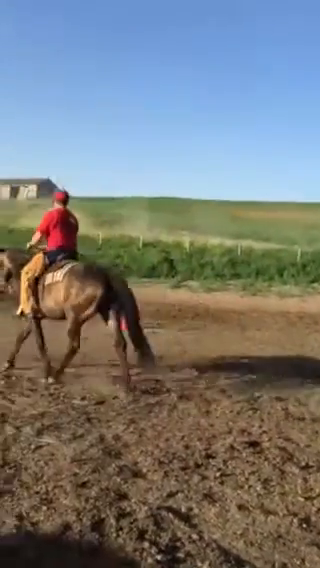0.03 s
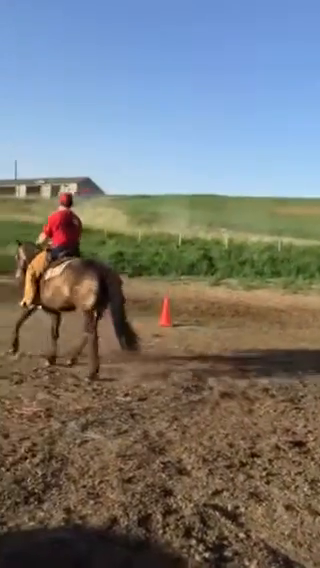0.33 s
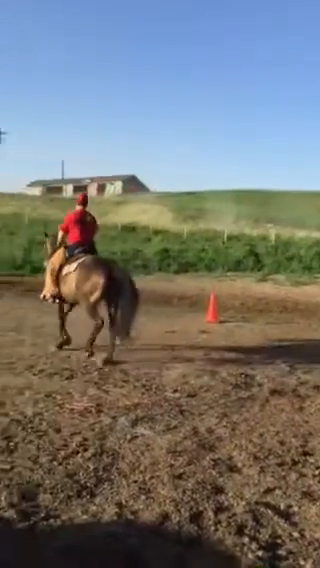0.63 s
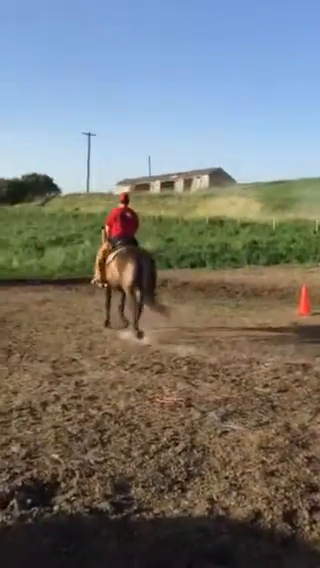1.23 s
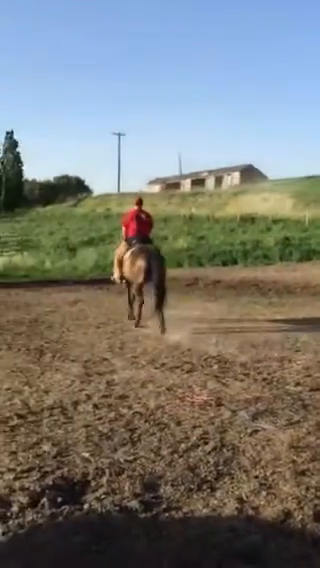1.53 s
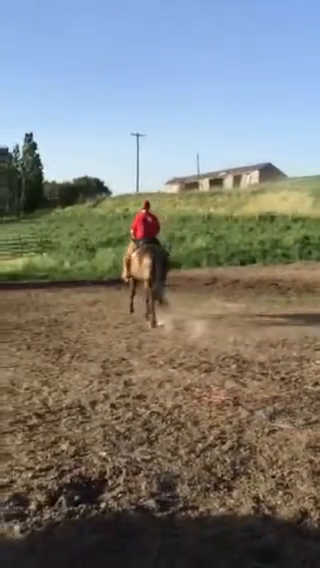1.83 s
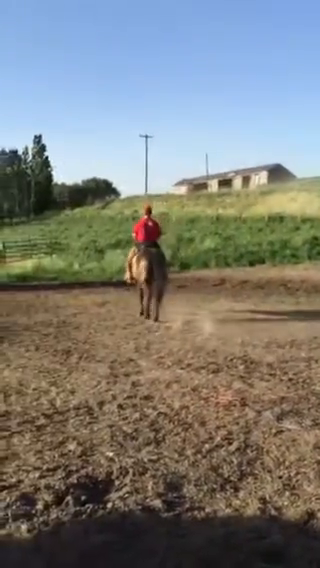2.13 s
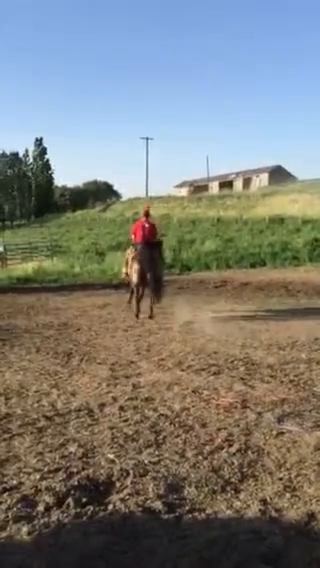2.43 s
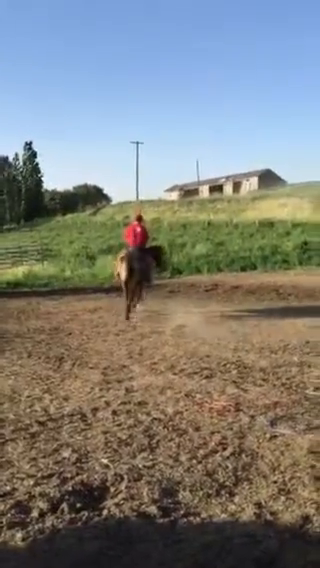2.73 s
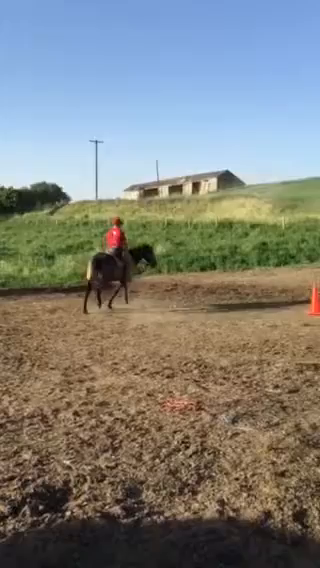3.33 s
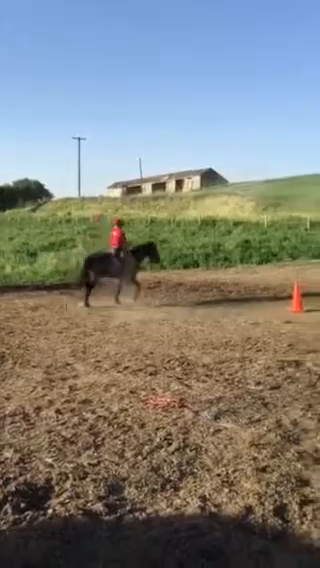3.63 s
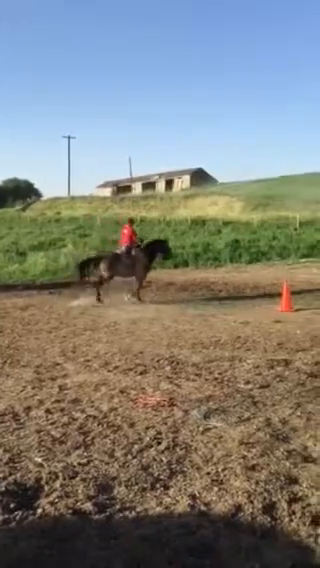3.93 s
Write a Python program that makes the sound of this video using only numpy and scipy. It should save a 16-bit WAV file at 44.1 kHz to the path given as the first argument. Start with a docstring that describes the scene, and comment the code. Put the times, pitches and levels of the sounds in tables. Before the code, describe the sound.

Metal tack clinks and jingles in irregular little bursts as a horse is ridden across an outdoor dirt arena. A gritty rush fades early, then wind gusts rumble and thump on the microphone over a faint, distant engine hum.

```python
"""A horse is ridden across a dirt arena, its metal tack clinking and rattling with its steps.
Knocked links give a crack and a short ring; two small pieces, probably spur rowels, ring until stopped.
Hooves scuff the dirt and kicked clods land. A broad, gritty rush dies away, a distant engine drones,
a small bird chips in threes, and gusts buffet the microphone with rumble, flutter and thumps."""
import sys
import numpy as np
from scipy import signal
from scipy.fft import rfft, irfft
from scipy.io import wavfile
from scipy.ndimage import uniform_filter1d

SR = 44100
rng = np.random.default_rng(int(sys.argv[2]) if len(sys.argv) > 2 else 0)


def transcribe(u):
    """Save the signal u as a 16-bit wav file named by the first command-line argument.

    u: samples, shape (n,) or (channels, n), limited to [-1, 1]; the rate is SR.
    q: integer samples, one column per channel.
    """
    v = np.clip(np.atleast_2d(u).T, -1, 1)
    q = np.round(v * 32767).astype(np.int16)
    wavfile.write(sys.argv[1], SR, q)


N = 176400
T = np.arange(N) / SR

# modes of a tack link, also heard in the chain: f/Hz, level/dB, t60/s
LINK_MODES = [(6980,-19,0.032),(7020,-7,0.055),(7740,-28,0.055),(8950,-12.5,0.039),(9730,-18,0.014),(10500,-32,0.013),(10980,-14.5,0.023),(11160,-4.5,0.028),(12100,-13,0.02),(14200,-18,0.016)]


def from_db(db):
    """Decibels to gain."""
    return np.exp(np.asarray(db) * (np.log(10) / 20))


def rms_one(x):
    """Scale to unit power."""
    return x / np.sqrt(np.mean(x ** 2) + 1e-20)


def automation(rows):
    """One curve per column, drawn through breakpoints that start with their time."""
    times, *columns = np.transpose(rows)
    return [np.interp(T, times, column) for column in columns]


def noise(spectrum, source=None):
    """White noise, or a given source, through an EQ curve (f/Hz, level/dB), at unit power."""
    hz, db = np.transpose(spectrum)
    bins = np.maximum(np.arange(N // 2 + 1) * SR / N, 1)
    source = rng.standard_normal(N) if source is None else source
    eq = from_db(np.interp(np.log(bins), np.log(hz), db, right=-120))
    return rms_one(irfft(rfft(source) * eq, N))


def drift(rate_hz):
    """A random modulator of unit power that rolls off above its rate."""
    bins = np.arange(N // 2 + 1) * SR / N
    return rms_one(irfft(rfft(rng.standard_normal(N)) / (1 + (bins / rate_hz) ** 2), N))


def evened(x, samples):
    """Ride out the slow swings of level."""
    return x / np.sqrt(uniform_filter1d(x * x, samples) + 1e-9)


def add(out, start, sound):
    """Mix a sound in at a start time in seconds."""
    i = int(np.clip(start * SR, 0, N))
    out[i:i + len(sound)] += sound[:N - i]


def gate(start, hold, attack_s, release_s):
    """An envelope that swells, holds and dies away exponentially."""
    return np.exp(np.minimum(T - start, 0) / attack_s - np.maximum(T - start - hold, 0) / release_s)


def grit(count=8000, low_hz=150, high_hz=6500, t60_s=.05, range_db=18):
    """Countless crumbs of dirt, each a tiny damped ping of its own pitch and size."""
    out, t = np.zeros(N), T[:SR // 25]
    for when, pitch, size, phase in rng.random((count, 4)):
        hz = low_hz + pitch * (high_hz - low_hz)
        envelope = from_db(range_db * size - 60 * t / t60_s)
        add(out, when * T[-1], envelope * np.sin(2 * np.pi * (hz * t + phase)))
    return rms_one(out)


def rush(grit_db=-5, air_db=-74, flicker_db=.5, grain_db=.5):
    """A broad, gritty rush in three bands dies away into still air."""
    # band faders: t/s, low level/dB, middle level/dB, treble level/dB
    faders = [(0.0, -41.5, -43.5, -50.5), (0.17, -42.5, -43.5, -54.5), (0.32, -45, -46.5, -54.5),
              (0.61, -48, -47.5, -61), (1.009, -52, -52.5, -67), (1.26, -56, -54, -66.5),
              (1.57, -69.5, -53.5, -61.5), (1.9, -63.5, -59.5, -68.5), (2.02, -64, -62.5, -70.5),
              (2.57, -69.5, -65.5, -79), (3.539, -71, -69, -84), (4.0, -71.5, -71.5, -85)]
    # colours of the three bands and of the air: f/Hz, level/dB
    low = [(120,-11),(180,3.5),(250,-8.5),(350,-21),(480,-3),(655,2),(760,-3.5),(875,3),(1200,-4.5),(1700,-11.5),(3000,-46)]
    middle = [(700,-0.5),(1100,-3),(1400,2.5),(1800,-1),(2150,-4),(2450,-2.5),(2700,-6),(3100,-14.5),(4500,-47)]
    treble = [(1800,-4.5),(2400,-4),(2700,5.5),(3200,-2),(3850,1.5),(4500,-4.5),(5300,-11),(6500,-13.5),(9000,-20),(15000,-22.5)]
    air = [(300,-11),(2000,5),(5000,4),(8000,-2),(12000,-5),(15500,-5.5)]
    trims_db = (0, -.5, 2.5)
    crumbs = from_db(grit_db) * grit()
    out = from_db(air_db) * noise(air)
    for fader_db, colour, trim_db in zip(automation(faders), (low, middle, treble), trims_db):
        source = rng.standard_normal(N) + np.roll(crumbs, rng.integers(N))
        level_db = fader_db + trim_db + flicker_db * drift(9.6) + grain_db * drift(290)
        out += from_db(level_db) * noise(colour, source)
    return out


def engine(wander=.006, waver_db=1.2, drone_db=-37, fade_db_per_s=2):
    """A far engine hums on four low harmonics of its speed, over a dull, fading drone."""
    # engine speed and hum fader: t/s, fundamental f/Hz, level/dB
    running = [(0,58.5,-36.5),(.4,58.2,-40.5),(1.0,57.8,-45),(1.5,57.8,-40),(1.9,57.5,-45.5),(2.2,53.5,-46.5),(2.8,53.5,-59),(3.3,54.5,-49),(3.65,54.3,-43),(4,53.5,-35.5)]
    # harmonics: multiple, level/dB
    orders = [(1,-19),(2,-2),(3,-9),(4,-23.5)]
    # drone colour: f/Hz, level/dB
    drone = [(15,-26),(30,-19),(48,-6.5),(70,4),(95,-5),(140,-3.5),(200,-14.5),(280,-28.5),(500,-44.5)]
    hz, db = automation(running)
    phase = 2 * np.pi * np.cumsum(hz * (1 + wander * drift(1.82))) / SR
    hum = np.zeros(N)
    for order, order_db in orders:
        gain = np.sqrt(2) * from_db(db + order_db + waver_db * drift(1.5))
        hum += gain * np.sin(order * phase + 2 * np.pi * rng.random())
    return hum + from_db(drone_db - fade_db_per_s * T) * evened(noise(drone), samples=2000)


def strike(hz, db, t60, t, spin, waver_db=2.6):
    """One blow on a metal piece; every mode wavers in level as the piece turns."""
    hz, db, t60 = np.array([hz, db, t60])[:, :, None]
    waver = spin[rng.integers(0, N - len(t), hz.shape) + np.arange(len(t))]
    envelopes = from_db(db + waver_db * waver - 60 * t / t60)
    return np.sum(envelopes * np.sin(2 * np.pi * (hz * t + rng.random(hz.shape))), axis=0)


def clinks(knocks, modes, spin, detune, trim_db=-13.5, crack_db=-8, crack_t60_s=.021):
    """Each knock on a link is a brief crack and a damped ring, its pitch and colour set by the contact."""
    pivot_hz, spread_db = 9100, 2.5
    out, t = np.zeros(N), T[:SR // 20]
    hz, mode_db, t60 = np.transpose(modes)
    tilt = .74 * np.tanh(4 * np.log2(hz / pivot_hz))  # bright knocks favour modes above the pivot
    crack_noise = noise([(2500, -23), (4000, 2.5), (5500, -4.5), (6800, -5),
                         (10000, 5.5), (12500, -2), (15500, -7.5)])
    crack_envelope = from_db(crack_db - 60 * t / crack_t60_s)
    for start, db, brightness in knocks:
        colour_db = mode_db + brightness * tilt + spread_db * rng.standard_normal(len(hz))
        detuned_hz = hz * (1 + detune * rng.standard_normal(len(hz)))
        ring = strike(detuned_hz, colour_db, t60, t, spin)
        crack = crack_noise[rng.integers(N - len(t)):][:len(t)] * crack_envelope
        add(out, start, from_db(db + trim_db) * (ring + crack))
    return out


def chain(spin, gap_s=.005, uneven_db=1.5):
    """A short chain shakes: a quick run of light touches, each on a link of another size."""
    # rattles: t/s, length/s, touch level/dB
    rattles = [(0.1,0.044,-46),(0.336,.045,-50),(0.429,.03,-42),(1.269,0.023,-46),(1.543,0.033,-51),(1.86,.04,-53),(2.219,0.023,-48),(2.261,.025,-50),(2.636,.04,-54),(2.687,0.05,-47),(3.108,.025,-49),(3.839,.015,-43)]
    touches = [(start + delay + gap_s * rng.random(), db + uneven_db * rng.standard_normal(), 0)
               for start, length, db in rattles for delay in np.arange(0, length, gap_s)]
    return clinks(touches, LINK_MODES, spin, detune=.12)


def tack(spin, detune=.009):
    """Two metal links knock with the horse's steps, the higher one taking over."""
    # knocks on each link: t/s, level/dB, brightness
    knocks = [(.1196,-28,-7),(0.1339,-29,13),(.302,-48,-22),(0.348,-47,14),(.364,-44,15),(.4324,-41,-16),(0.438,-42,1),(0.4496,-27,-7),(.456,-37,9),(.5437,-46,-17),(.565,-40,-4),(.6444,-44,-5),(.7507,-39.5,-8),(.8764,-46,29),(1.1004,-47.5,-4),(1.1852,-45,8),(1.198,-39,7),(1.277,-39,-2),(1.286,-33,-8),(1.291,-30.5,0),(1.35,-42,-13),(1.4905,-54.5,-24),(1.5468,-34.5,-8.5),(1.554,-36,0),(1.565,-40,4),(1.8582,-51,-2),(1.8861,-57,0),(1.992,-44.5,1),(2.1161,-55,-17),(2.2236,-41,11),(2.267,-36,11),(2.3201,-42.5,-9),(2.6479,-49,5),(2.6647,-45,4),(2.6813,-35.5,-16.5),(2.694,-51,9),(2.705,-40,0),(2.713,-32.5,-1)]
    high_knocks = [(2.472,-59.5,-21),(2.858,-50,1),(2.8968,-55,6),(3.0844,-52,0),(3.1158,-36,0.5),(3.125,-41,-2),(3.14,-50,8),(3.447,-45,-19),(3.463,-39,-6),(3.479,-47,19),(3.5294,-52,18),(3.7843,-50,7),(3.8385,-24.5,6.5),(3.84,-38,2),(3.853,-47,-2),(3.863,-49,-4),(3.908,-46,-5),]
    # modes of the higher link: f/Hz, level/dB, t60/s
    high_modes = [(7180,-19,0.034),(7730,-4,0.053),(7960,-10,0.057),(8840,-5.5,0.058),(9500,-2.5,0.02),(10200,-19,.015),(11050,-4,0.04),(11400,-14.5,0.049),(12300,-16,0.026),(14600,-26.5,0.017)]
    return clinks(knocks, LINK_MODES, spin, detune) + clinks(high_knocks, high_modes, spin, detune)


def rowel(hits, modes, bands_hz, spin, trim_db, rise_s=.005, stop_t60_s=.11):
    """A loose disc rings until it touches its holder; where it is hit decides which modes speak."""
    out, t = np.zeros(N), T[:SR // 3]
    hz, mode_db, t60, side = np.transpose(modes)
    attack = 1 - np.exp(-t / rise_s)
    for start, free_s, *band_db, lean_db in hits:
        twin_db = -10 * np.abs(side) * np.log10(1 + from_db(-side * lean_db) ** 2)  # twins share power
        ring = strike(hz, mode_db + twin_db + np.interp(hz, bands_hz, band_db), t60, t, spin)
        choke_db = -60 * np.maximum(t - free_s, 0) / stop_t60_s
        add(out, start, ring * attack * from_db(trim_db + choke_db))
    return out


def spurs(spin):
    """Two jolted rowels ring, shimmering as their close twin modes beat."""
    # hits on each rowel: t/s, free ring/s, level/dB for each band, lean between twins/dB
    first_hits = [(.134,.08,-70,-57.5,-60,-69,-60,-5),(.302,0.082,-63,-61,-61,-64,-61,-13),(.436,.09,-66,-70,-70,-72,-58,-5),(.5437,.15,-64,-60,-68,-71,-65,-17),(.7507,.09,-68,-67,-72,-69,-64,15),(1.1852,0.056,-65.5,-64,-70,-62,-65,4),(1.286,0.19,-68,-53.5,-64,-70,-63,13),(1.517,0.051,-65,-68,-69,-68,-61,5),(1.556,0.13,-65.5,-73,-66,-72,-61,-2),(1.8861,0.09,-71,-72,-73,-75,-80,0),(1.9924,0.11,-71,-78,-66.5,-87,-85,12),(2.2228,.04,-73,-57.5,-68,-76,-68,12),(2.3201,.14,-69,-69,-69,-69,-68.5,6),(2.582,.05,-73.5,-77,-76,-90,-83,12),(2.6813,0.11,-69.5,-77,-60,-68,-71,-3)]
    second_hits = [(.842,0.065,-78,-66,-84,-80,3),(1.8582,.05,-73,-70,-82,-86,5),(2.2667,0.019,-66.5,-65,-66,-79,5),(2.385,.2,-67,-66,-67.5,-82,8),(2.6653,.1,-80,-68.5,-61,-68,0),(2.762,0.034,-82,-61,-69,-75,0),(2.7931,0.067,-74,-55.5,-57,-70,-9),(3.1173,0.19,-77,-55,-60,-66,5),(3.4461,.13,-83,-63,-68,-67,-7),(3.8167,0.022,-73,-58,-73,-76,2),(3.8387,0.084,-70.5,-63,-61,-63,3),(3.912,.1,-72.5,-62.5,-72,-70,3)]
    # their modes: f/Hz, level/dB, t60/s, side of a twin pair (+-1, or 0 if single)
    first_modes = [(4225,0,.4,0),(7970,0,.36,-1),(8076,0,.45,1),(11030,0,.36,1),(11270,0,.26,-1),(13210,-7,.4,0),(13680,-1,.33,0),(15007,0,.55,0)]
    second_modes = [(4700,0,.7,0),(8742,0,.24,-1),(8830,0,.3,1),(12040,0,.33,-1),(12160,0,.33,1),(14450,0,.45,-1),(14697,0,.48,1)]
    first_bands_hz, second_bands_hz = (4200, 8000, 11100, 13500, 15000), (4700, 8800, 12100, 14600)
    return (rowel(first_hits, first_modes, first_bands_hz, spin, trim_db=3)
            + rowel(second_hits, second_modes, second_bands_hz, spin, trim_db=2.5))


def gusts(lumpy_db=4):
    """Eddies hit the microphone: a deep rumble and a lumpy flutter above it."""
    # gusts: t/s, hold/s, rumble level/dB, flutter level/dB
    buffets = [(0.945,0.096,-33.5,-75),(1.008,0.0093,-37,-45),(1.907,.05,-32.5,-59),(1.981,0.17,-41,-53.5),(2.188,0.011,-43,-43),(2.277,0.027,-53,-34.5),(2.308,0.051,-34,-35.5),(2.44,0.019,-18,-26.5),(2.476,0.022,-30.5,-32.5),(2.6,0.065,-37.5,-42.5),(2.764,0.04,-34,-73),(2.885,0.027,-30,-46.5),(2.953,0.076,-34,-38.5),(3.068,0.011,-34,-42),(3.126,0.032,-35,-54),(3.313,0.032,-32,-41.5),(3.371,0.039,-34.5,-35.5),(3.468,0.03,-25.5,-60),(3.913,0.042,-33.5,-44.5),(3.982,.04,-41,-77)]
    # colours of the two layers: f/Hz, level/dB
    rumble_eq = [(15,-35),(30,-16.5),(50,3),(90,4.5),(140,-3),(200,-10),(300,-31.5),(600,-59)]
    flutter_eq = [(80,-17),(160,2.5),(230,3),(320,-8.5),(500,-14),(700,-26),(1000,-37.5),(2000,-71.5)]
    rumble = evened(noise(rumble_eq), samples=1300)
    flutter = evened(noise(flutter_eq) * from_db(lumpy_db * drift(60)), samples=1100)
    out = np.zeros(N)
    for start, hold, rumble_db, flutter_db in buffets:
        envelope = gate(start, hold, attack_s=.0056, release_s=.011)
        out += envelope * (from_db(rumble_db) * rumble + from_db(flutter_db) * flutter)
    return out


def clods(width=1.16):
    """Kicked clods and pebbles land with a short, pitched tick."""
    # landings: t/s, level/dB, f/Hz
    landings = [(.962,-58,4700),(1.561,-48,900),(1.833,-53.5,1880),(1.909,-56,1350)]
    out = np.zeros(N)
    for start, db, hz in landings:
        band = noise([(hz / 2, -35), (hz / width, -14), (hz, 0), (hz * width, -14), (hz * 2, -35)])
        out += from_db(db) * gate(start, 0, attack_s=.002, release_s=.011) * evened(band, samples=600)
    return out


def thumps(width_cycles=.28):
    """Single hard eddies thump the microphone, each one swing of pressure up and down."""
    # eddies: centre t/s, level/dB, f/Hz
    eddies = [(2.287,-18,87),(2.3,-32.5,334),(2.4475,-8,233),(2.464,-17,130),(2.486,-29,210),(2.5,-23,264),(2.797,-24,79),(2.898,-23,71.5),(3.007,-32.5,345),(3.078,-28,233),(3.34,-24,196),(3.372,-24,232),(3.393,-14.5,80.5),(3.926,-23.5,210),(3.946,-21,105)]
    out, t = np.zeros(N), T[:SR // 10]
    for centre, db, hz in eddies:
        cycles = hz * (t - t.mean())
        swing = -np.sin(2 * np.pi * cycles) / np.cosh(cycles / width_cycles)
        add(out, centre - t.mean(), from_db(db) * swing)
    return out


def hooves(hold_s=.018, grain_db=4):
    """Hooves drag through loose dirt in soft, gritty scuffs."""
    # scuffs: t/s, level/dB
    scuffs = [(2.669,-62.5),(3.385,-64.5),(3.76,-68)]
    # colour of the dirt: f/Hz, level/dB
    dirt_eq = [(400,-35),(900,7),(1600,16.5),(2600,10),(4000,-2),(8000,-16),(15000,-13)]
    dirt = rms_one(noise(dirt_eq) * from_db(grain_db * drift(200)))
    return dirt * sum(from_db(db) * gate(start, hold_s, attack_s=.0045, release_s=.05)
                      for start, db in scuffs)


def bird(length_s=.0232, top_hz=5970, fall_hz=483, trim_db=-2, rough_db=4):
    """A small bird gives short, slightly rough falling chips in threes."""
    # chips: t/s, level/dB
    chips = [(2.797,-69),(2.828,-63.5),(2.865,-66),(3.089,-64),(3.124,-60),(3.159,-59.5),(3.4,-68),(3.435,-67),(3.47,-68),(3.724,-69),(3.757,-66),(3.793,-66)]
    out, progress = np.zeros(N), T[T < length_s] / length_s
    phase = 2 * np.pi * np.cumsum(top_hz - fall_hz * progress) / SR
    chip = np.sin(np.pi * progress) ** 2 * np.sin(phase)
    for start, db in chips:
        add(out, start, from_db(db) * chip)
    return out * from_db(trim_db + rough_db * drift(300))


def echo(x, level_db=-14.5, t60_s=.23):
    """Sound scatters off the ground and the horse in a short, diffuse tail."""
    t = T[:SR // 5]
    tail = rng.standard_normal(len(t)) * from_db(-60 * t / t60_s)
    return from_db(level_db) * signal.fftconvolve(x, tail / np.linalg.norm(tail))[:N]


def scene():
    """The mono mix; only the links and the bird feed the echo."""
    spin = drift(rate_hz=30)  # level waver of the turning metal pieces
    links = tack(spin) + chain(spin)
    rowels = spurs(spin)
    send = links + bird()
    mix = send + echo(send) + rowels + gusts() + thumps() + rush() + engine() + hooves() + clods()
    return mix[None]


def record(dry, fade_s=.008, cutoff_hz=15500):
    """The ends fade briefly and the top is cut steeply."""
    fade = np.minimum(np.minimum(T, T[-1] - T) / fade_s, 1)
    lowpass = signal.ellip(12, .2, 80, cutoff_hz, fs=SR, output="sos")
    return signal.sosfilt(lowpass, dry * fade)


dry = scene()
out = record(dry)
transcribe(out)
```